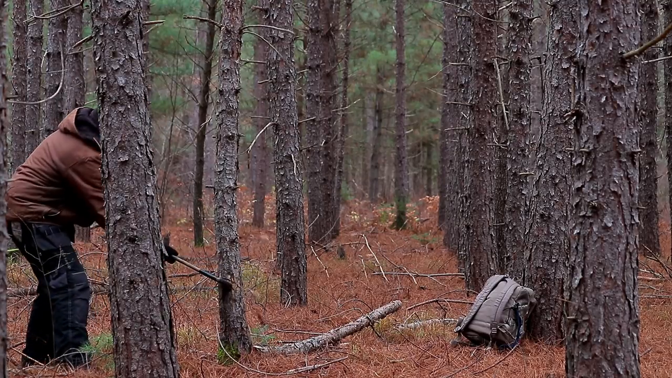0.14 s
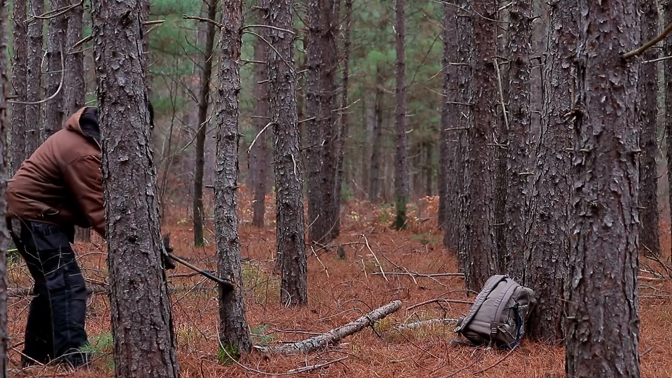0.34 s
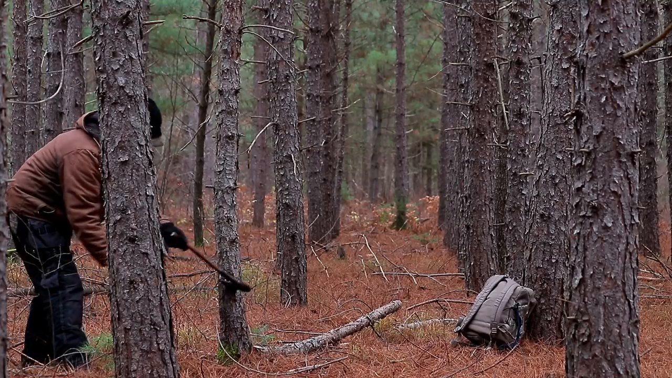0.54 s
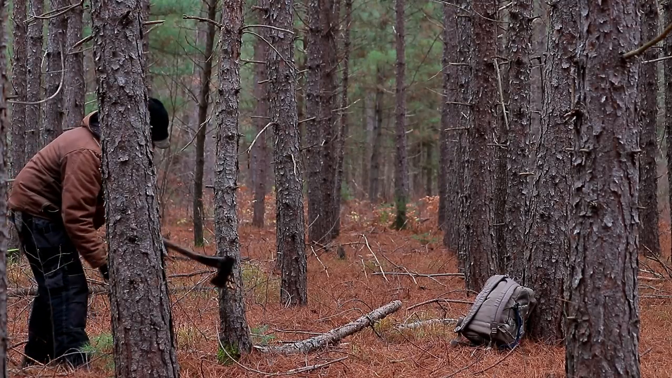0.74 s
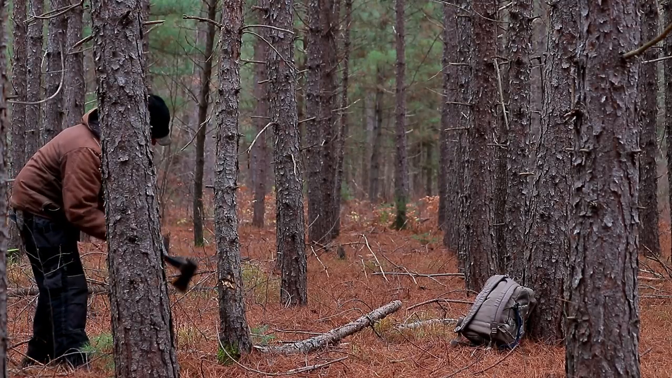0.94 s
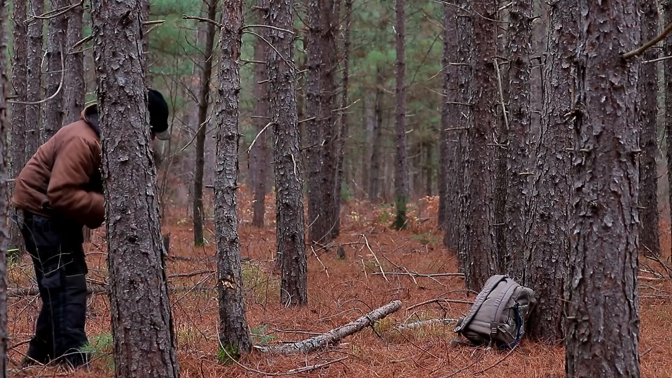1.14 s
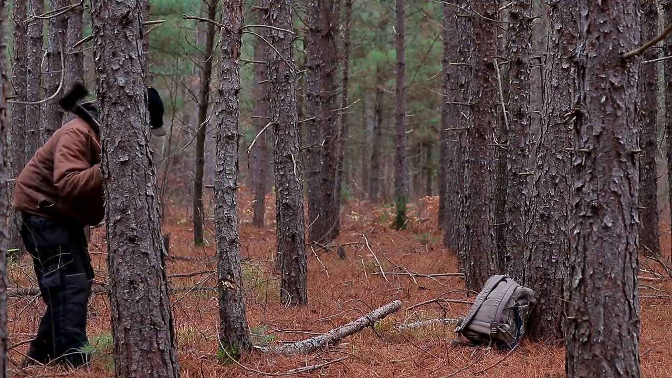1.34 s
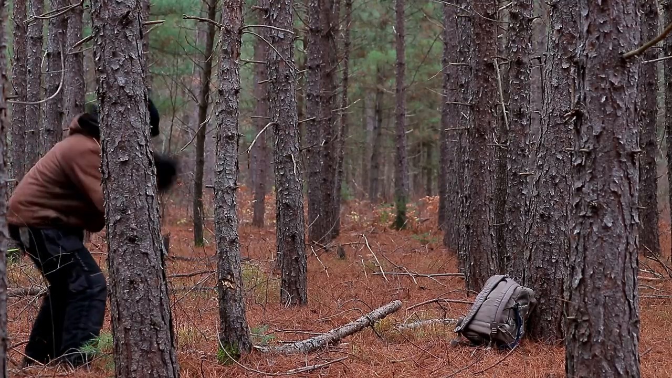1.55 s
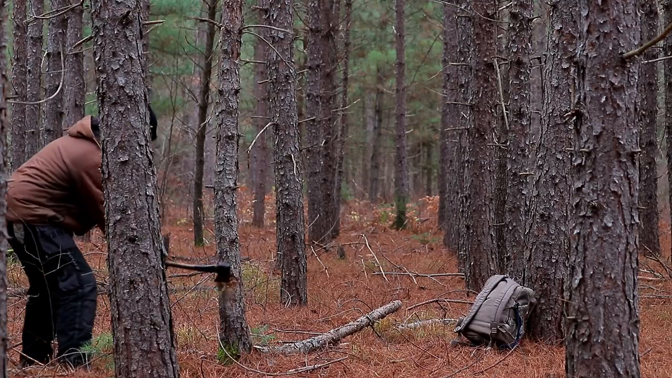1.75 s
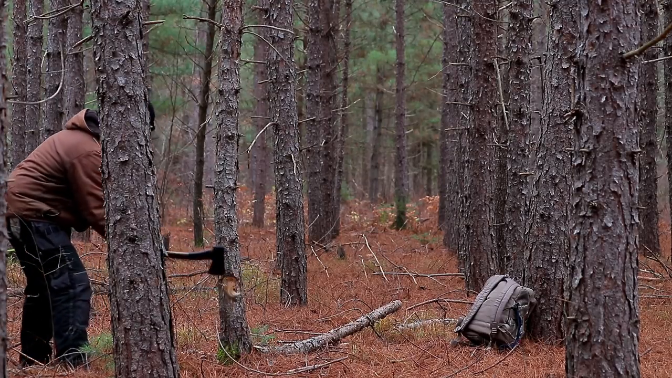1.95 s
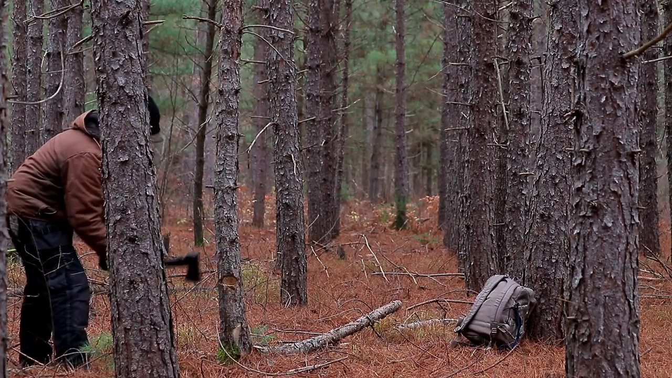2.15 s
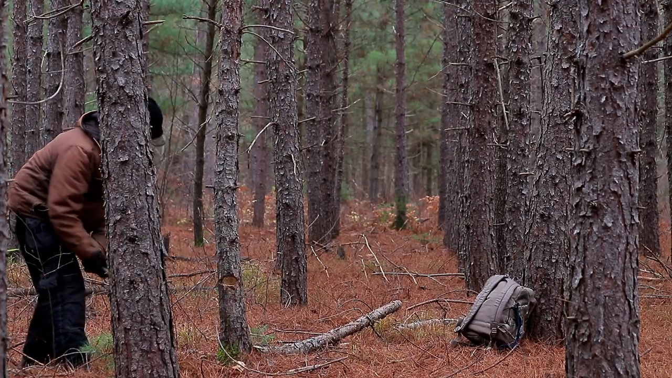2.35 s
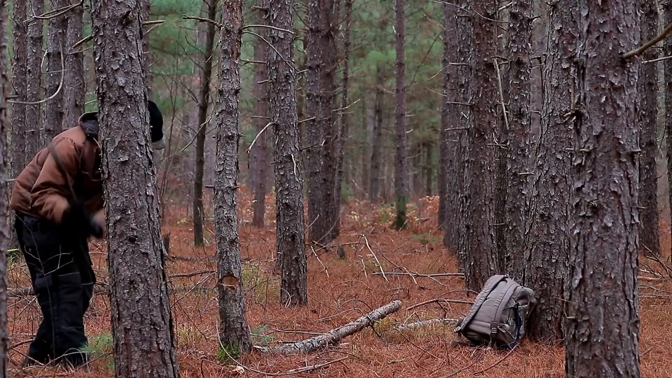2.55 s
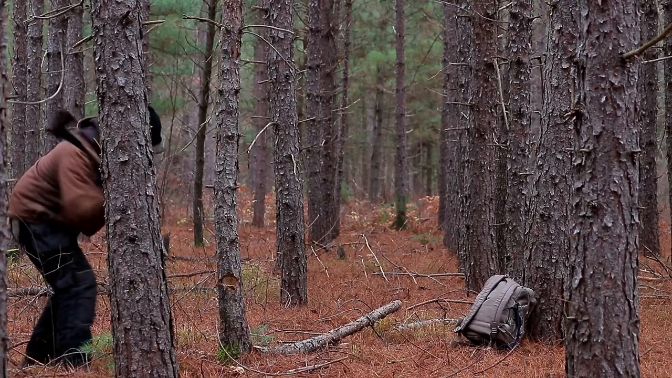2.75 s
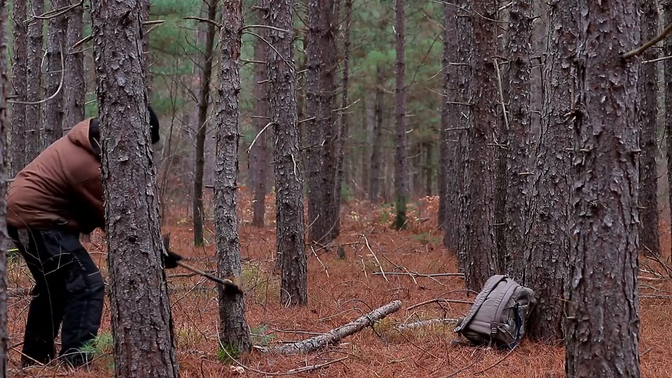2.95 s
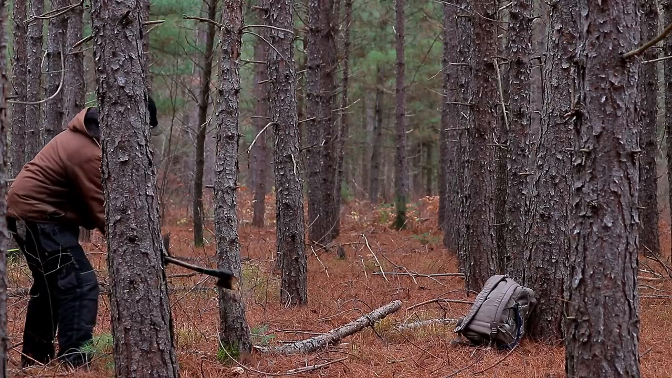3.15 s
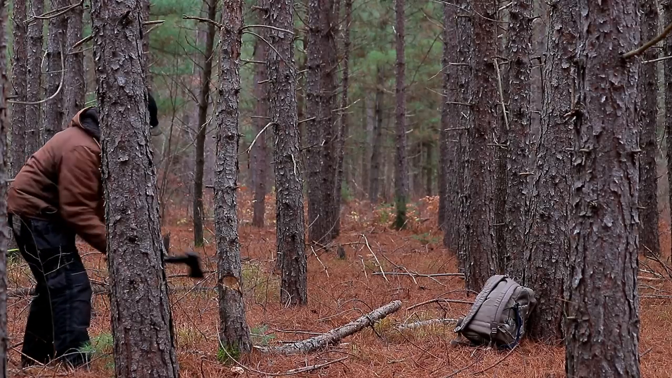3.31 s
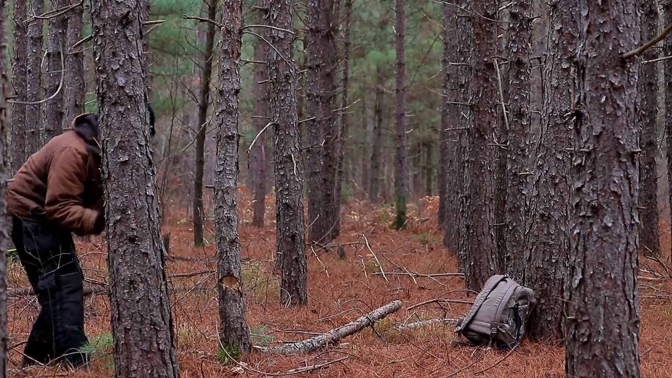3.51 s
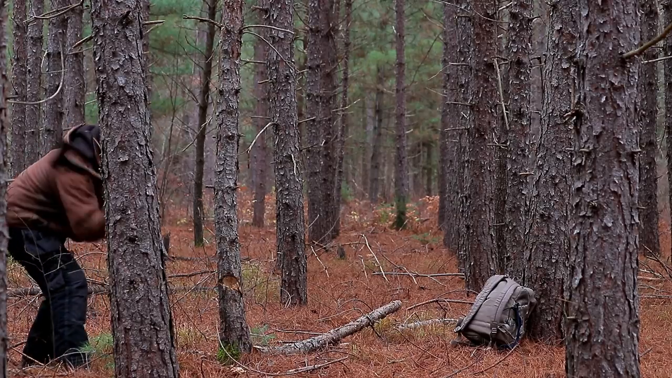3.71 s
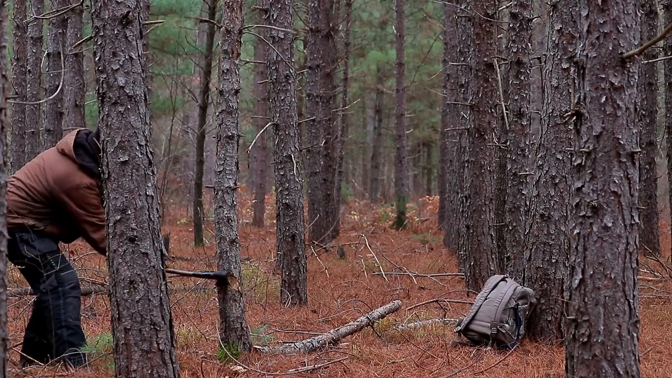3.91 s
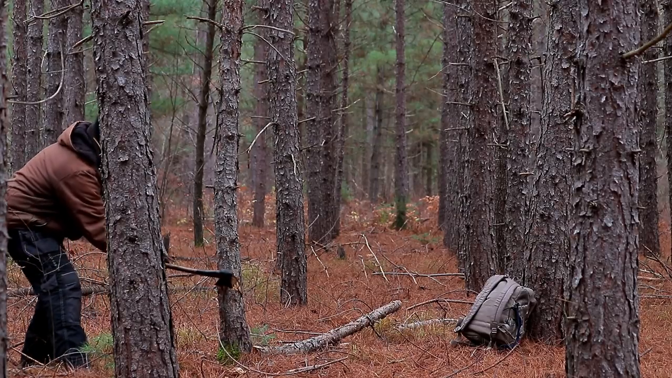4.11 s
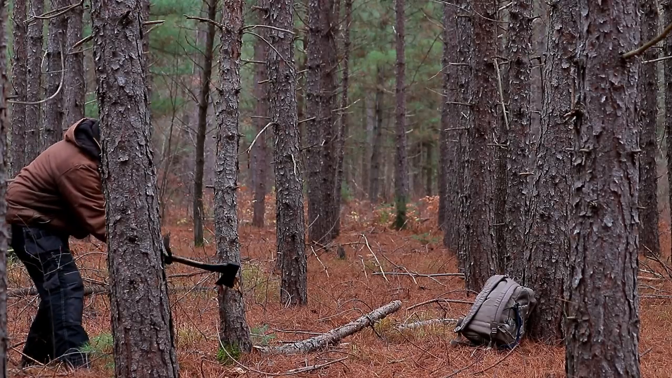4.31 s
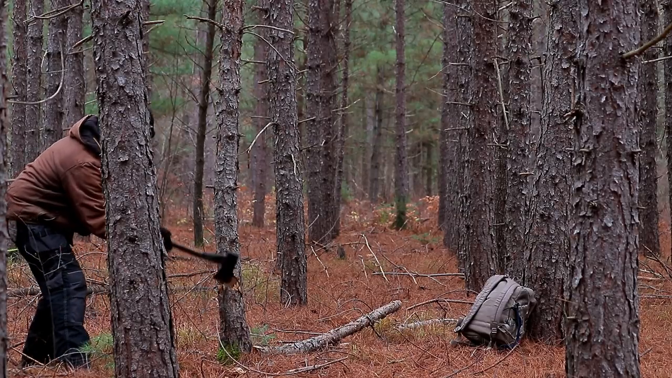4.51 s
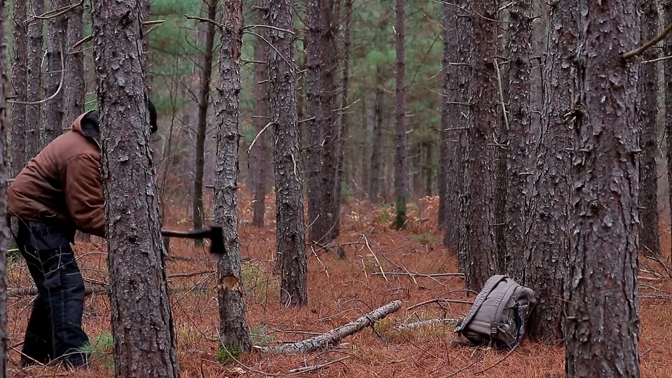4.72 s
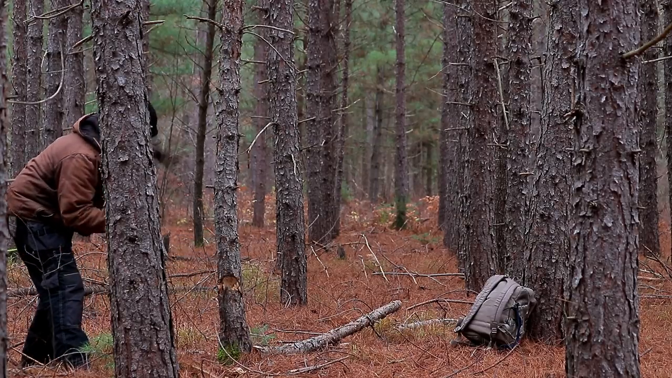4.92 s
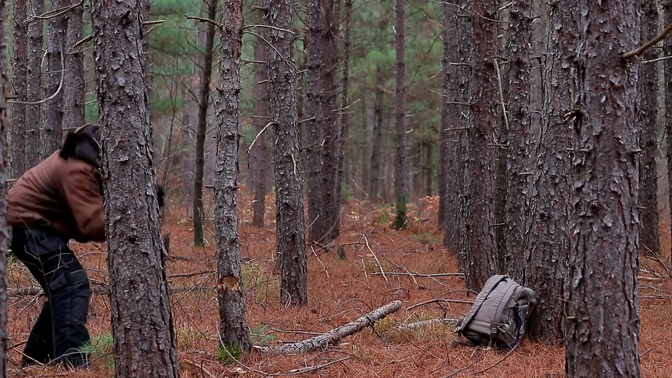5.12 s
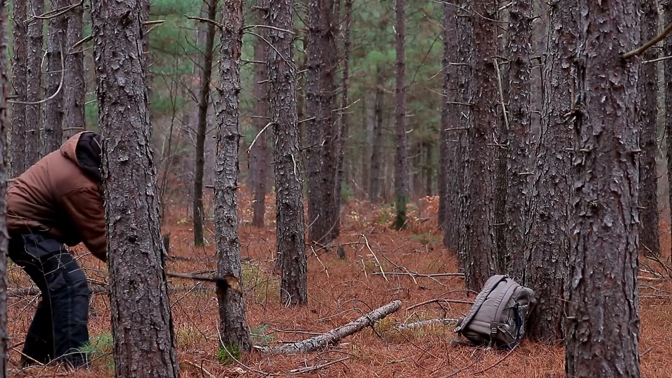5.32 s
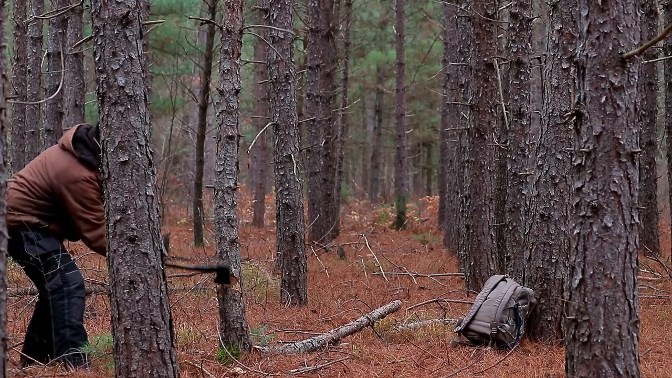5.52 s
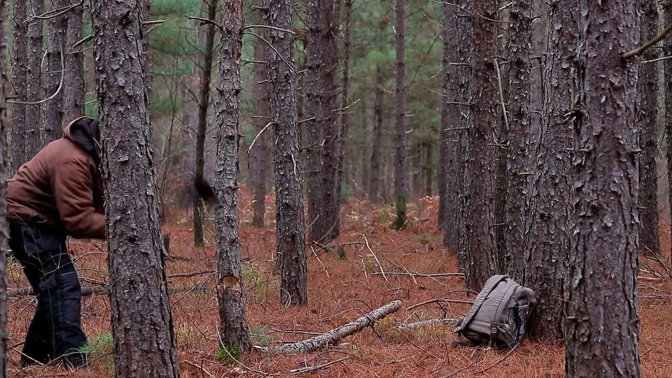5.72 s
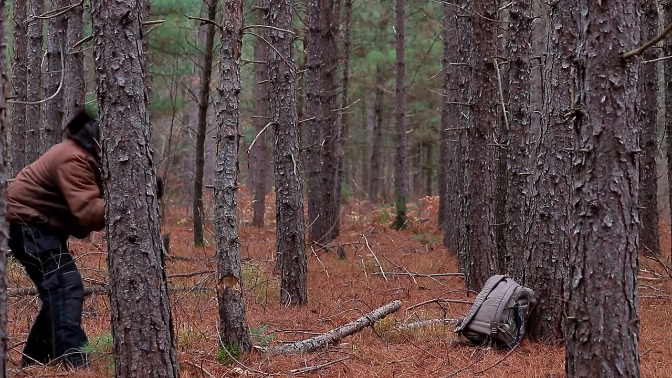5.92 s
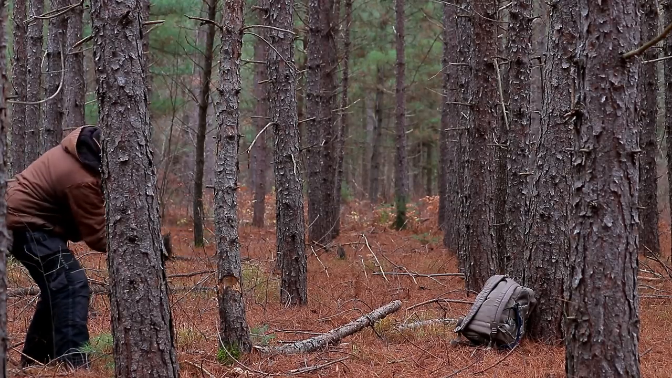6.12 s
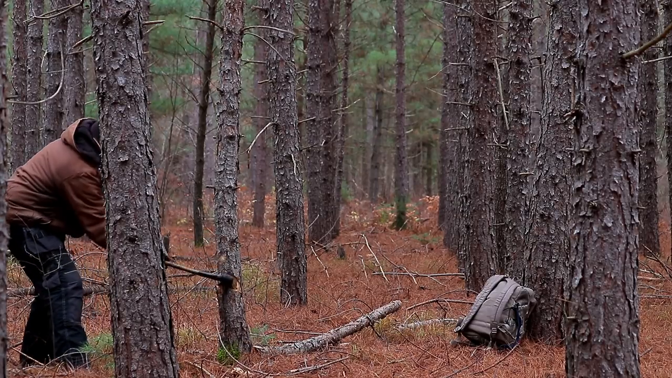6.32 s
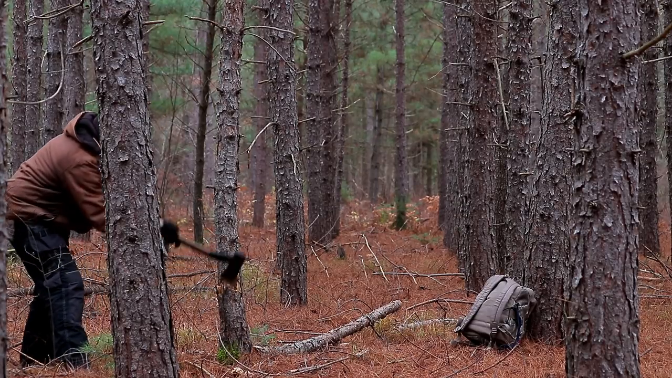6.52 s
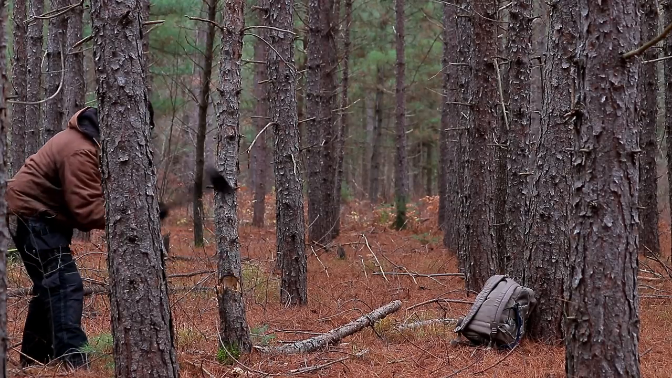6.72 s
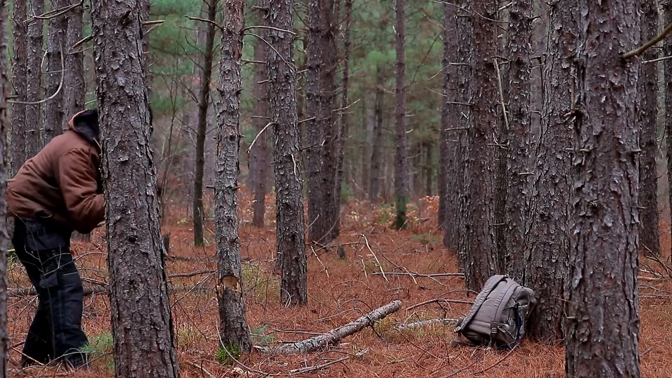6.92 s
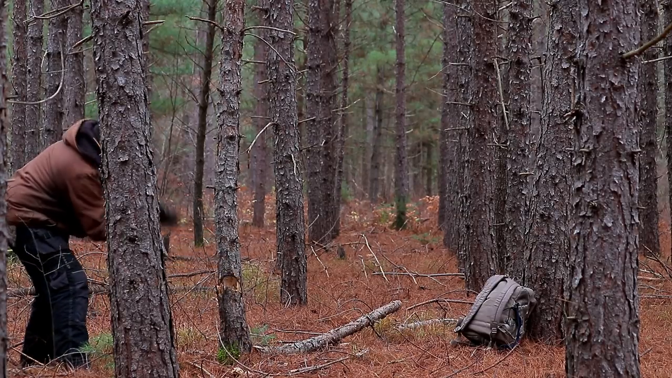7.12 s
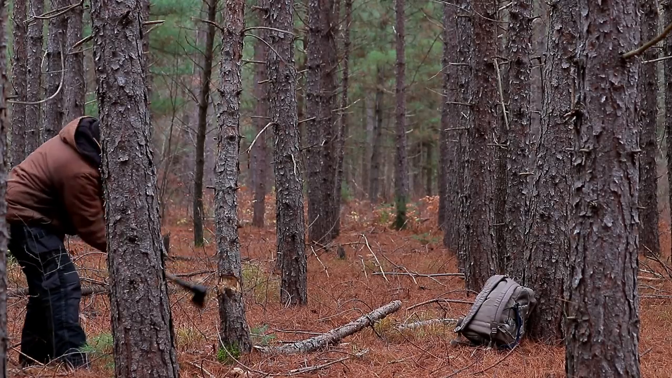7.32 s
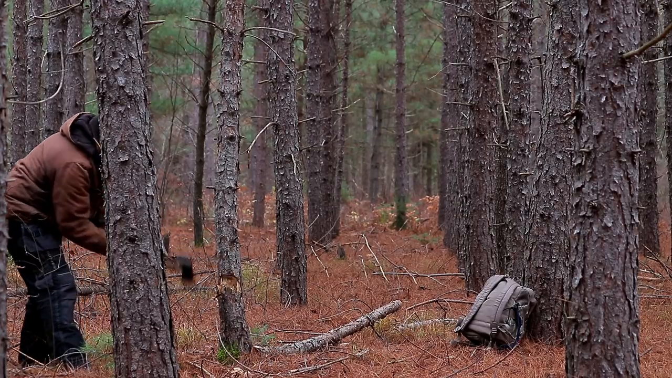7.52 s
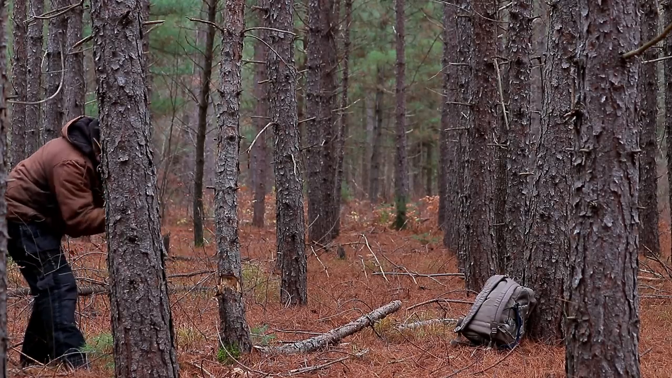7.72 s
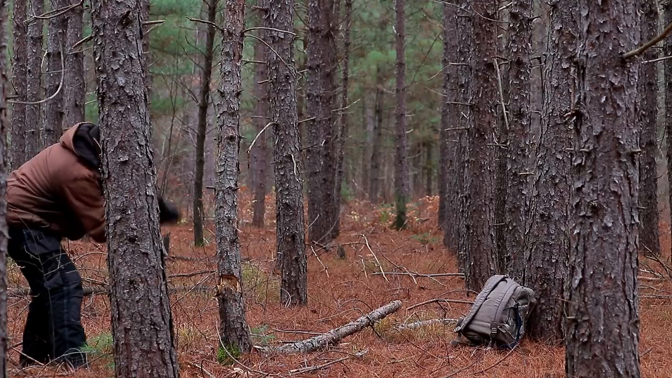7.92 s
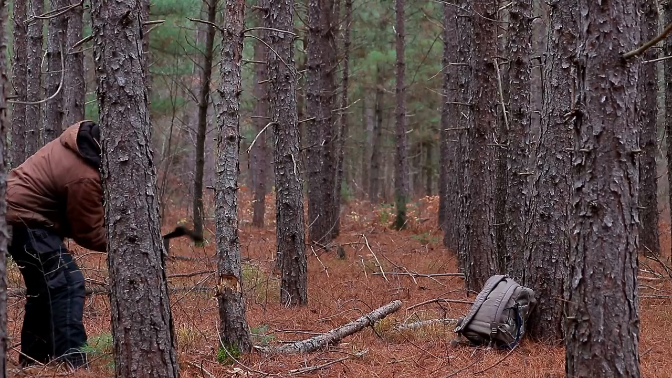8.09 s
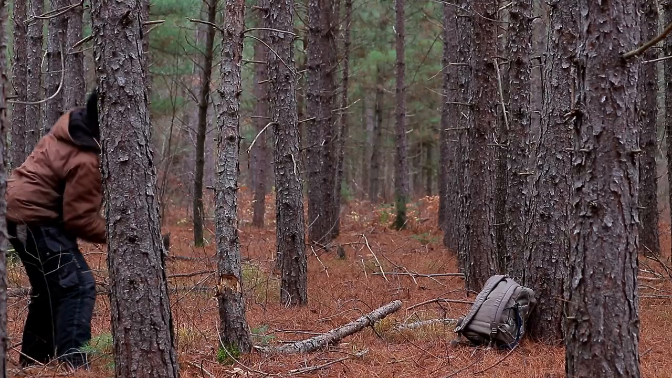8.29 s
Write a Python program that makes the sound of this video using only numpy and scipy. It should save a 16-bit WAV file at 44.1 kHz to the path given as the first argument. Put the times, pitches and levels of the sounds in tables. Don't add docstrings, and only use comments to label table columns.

```python
import sys
import numpy as np
from scipy import signal
from scipy.fft import rfft, irfft, next_fast_len
from scipy.io import wavfile
from scipy.ndimage import uniform_filter1d, minimum_filter1d

SR = 44100
rng = np.random.default_rng(int(sys.argv[2]) if len(sys.argv) > 2 else 0)


def attenuation_scalar(level_db):
    decades = np.asarray(level_db, float) / 20
    return 10 ** decades


def dump(signal):
    limited = np.clip(np.atleast_2d(signal).T, -1, 1)
    pcm = np.round(limited * 32767).astype(np.int16)
    wavfile.write(sys.argv[1], SR, pcm)


N = 368235
LEAD = 4410


def seconds():
    return (np.arange(N + LEAD) - LEAD) / SR


def sample(s):
    return int(round(s * SR)) + LEAD


def rms_one(x):
    return x / np.sqrt(np.mean(x ** 2) + 1e-20)


def band(x, low_hz, high_hz):
    sections = signal.butter(2, [low_hz, min(high_hz, .45 * SR)], "band", fs=SR, output="sos")
    return signal.sosfilt(sections, x)


def drift(rate):
    knots = rng.standard_normal(400)
    return np.interp(seconds() * rate + 5, np.arange(400), knots)


def add(out, s, sound):
    part = out[sample(s):sample(s) + len(sound)]
    part += sound[:len(part)]


def crack(modes, hiss_db):
    t = np.arange(1200) / SR
    late = np.maximum(t - .0008, 0)
    ring = 0
    for k, (hz, width_hz, db) in enumerate(modes):
        dying = np.exp(-np.pi * 1.1 * width_hz * late)
        ring = ring + (-1) ** k * attenuation_scalar(db) * width_hz * dying * np.sin(2 * np.pi * hz * late)
    sinking = (1 - np.exp(-late / 0.0026)) ** 2
    choked = 0.084 + np.exp(-(late / 0.0036) ** 4)
    ring = ring * sinking * choked
    tearing = signal.lfilter([1], [1, -.85], band(rng.standard_normal(1200), 1000, 5000))
    swell = t / 0.0019 * np.exp(1 - t / 0.0022) + 0.027 * np.exp(-t / 0.0027)
    return ring / np.abs(ring).max() + attenuation_scalar(hiss_db) * rms_one(tearing) * swell


def spray():
    t = np.arange(SR // 2) / SR
    noise = rng.standard_normal((2, SR // 2))
    coarse = rms_one(band(noise[0], 4900, 9000)) * (attenuation_scalar(-60 * t / 0.5) + attenuation_scalar(10.5 - 60 * t / 0.025))
    fine = rms_one(band(noise[1], 9000, 15500)) * (attenuation_scalar(-12 - 60 * t / .3) + attenuation_scalar(7.5 - 60 * t / 0.029))
    return (coarse + fine) * (1 - np.exp(-t / 0.00037))


def thump(*loads_db):
    # f/Hz, t60/s
    sway = [(79, 0.25), (113, 0.06), (148, 0.11), (188, .09), (240, 0.083), (312, 0.085), (352, 0.11),
            (430, 0.1), (545, .06)]
    knock = (-2, -7.5, -12, -13)
    # f/Hz, t60/s, level above the third mode/dB
    thud = (165, .04, 4.8)
    t = np.arange(SR // 2) / SR
    loads_db = list(loads_db) + [loads_db[-1] + below for below in knock] + [loads_db[2] + thud[2]]
    modes = list(sway) + [thud[:2]]
    ring = 0
    for (hz, t60), db in zip(modes, loads_db):
        ring = ring + attenuation_scalar(db + 5.5 - 60 * t / t60) * np.sin(2 * np.pi * hz * t)
    push = 1 - np.exp(-t / 0.0035)
    return push * ring


def from_all_sides(sound, tilt_db, blur_hz):
    size = 4096
    sharp = power = np.abs(rfft(sound, size)) ** 2
    for _ in range(2):
        power = uniform_filter1d(power, max(int(blur_hz * size / SR), 1))
    octaves = np.log2((np.arange(len(power)) * SR / size + 300) / 1800)
    wide_bins = int(2200 * size / SR)
    wide = uniform_filter1d(uniform_filter1d(power, wide_bins), wide_bins)
    power = wide + (power - wide) / (1 + 2 ** (4 * (octaves - .75)))
    sharp = sharp / (1 + 2 ** (5 * (octaves - .6)))
    spectrum = np.sqrt(np.abs(power) + sharp) * attenuation_scalar(tilt_db * octaves)
    return np.roll(irfft(spectrum, size), 150)[:300] * np.hanning(300)


def blows():
    # t/s, crack peak level/dB, splinter hiss level/dB, spray level/dB, sideways tilt/dB
    earlier = [
        (-0.026, -13, -10, -38, -2),
    ]
    # t/s, crack peak level/dB, splinter hiss level/dB, spray level/dB, sideways tilt/dB
    strikes = [
        (1.6996, -0.5, -14.5, -34.5, -3),
        (2.9490, -8, -14.5, -34.5, -5),
        (3.8952, -5.5, -24, -34.5, 0.7),
        (5.3308, -4, -21.5, -33.5, -0.7),
        (6.183, -4.5, -22.5, -35.5, -1.5),
        (7.231, -14.5, -12, -32.5, -2.5),
    ]
    # f/Hz, width/Hz, level/dB
    cracks = [
        [(1000, 1300, 8.5), (1485, 460, -1), (2000, 610, -3), (3460, 1640, -5)],
        [(925, 200, -20)] + [(1426.7, 23, -4.5), (1977, 140, 0.5), (2490, 60, 0.0), (3070, 48.7, -3),
         (3360, 87, -3.5), (3998, 110, 3), (4750, 350, -10)],
        [(990, 63, -5.5), (1647, 42, -2.5), (2218, 190, -2), (2730, 75, -8.5), (4060, 230, -11),
         (4850, 380, -13)],
        [(901, 260, -0.5), (1435, 56, -3.5), (2020, 430, -4), (3707, 360, -14.5), (4530, 82, -20.5)],
        [(656, 60, -11), (1253, 270, -1), (2268, 270, -11.5), (3700, 320, -17.5), (4690, 76, -35.5)],
        [(705, 35, -6.5), (1148, 370, 6), (2070, 77, -7), (3724, 120, -14.5), (4300, 50, -14.5)],
        [(1733, 110, -2.5)] + [(1256, 200, -3.0), (2553, 125, -3.5), (3260, 137, -5.5), (4220, 180, 1),
         (5400, 120, -24), (6080, 300, -14.0)],
    ]
    # root mode level/dB, trunk mode level/dB, depth of bite/0-1
    thumps = [
        (-29.5, -20, 0),
        (-35.5, -23.5, 0),
        (-27, -17.5, 0.31),
        (-24.5, -11.5, 0),
        (-30, -13.5, 0.59),
        (-30, -16, 0.86),
        (-30, -18.5, 0),
    ]
    glancing_db = (2.5, -8.5, -13, -15)
    deep_db = (-4.5, -0.95, 2.7, -1.5)
    glancing_lag_s, deep_lag_s = 0.0026, 0.0008
    sideways_db, aimed = -3.5, 0.44
    direct, sent = np.zeros((2, N + LEAD))
    for row, modes, (root_db, trunk_db, depth) in zip(list(earlier) + list(strikes), cracks, thumps):
        s, crack_db, hiss_db, spray_db, tilt_db = row
        loads_db = trunk_db + (1 - depth) * np.array(glancing_db) + depth * np.array(deep_db)
        lag = (1 - depth) * glancing_lag_s + depth * deep_lag_s
        bite = attenuation_scalar(crack_db + 2.5) * crack(modes, hiss_db)
        shake = thump(root_db, *loads_db)
        add(direct, s - .0008, bite)
        add(direct, s, attenuation_scalar(spray_db - 21.5) * spray())
        add(direct, s + lag, shake)
        sideways = from_all_sides(bite, tilt_db, blur_hz=645.3)
        add(sent, s - 150 / SR, attenuation_scalar(sideways_db - aimed * crack_db) * sideways)
        add(sent, s + lag, attenuation_scalar(-6.5) * shake)
    return direct, sent


def forest(dry):
    # f/Hz, near trunks level/dB, near t60/s, far trunks level/dB, far t60/s
    scatter = [(100, -43.5, 0.73, -58.5, 0.32), (257, -37.5, 0.12, -62.5, 0.9),
               (631.2, -40.5, 0.21, -58, 1.5), (1190, -44.5, 0.17, -58.5, 1.3),
               (2320, -40, 0.17, -57.5, 1.41), (4600, -43.5, 0.32, -62.5, 1.8),
               (8040, -40.5, 0.09, -52.5, 1), (14000, -45.5, 0.1, -57.5, 0.37)]
    t = np.arange(int(1.5 * SR)) / SR
    table = np.array(scatter)
    edges = 45 * 2 ** np.arange(0, 9, .5)
    white = rng.standard_normal((2, len(t)))
    response = 0
    for k, (low, high) in enumerate(zip(edges, edges[1:])):
        log_hz = np.log(low * high) / 2
        near_db, near_t60, far_db, far_t60 = (np.interp(log_hz, np.log(table[:, 0]), c) for c in table.T[1:])
        dying = attenuation_scalar(near_db - 60 * t / near_t60) + attenuation_scalar(far_db - 60 * t / far_t60)
        dying = dying * attenuation_scalar(-9 * t * low * high / 4000 ** 2)
        response = response + dying * band(white[k % 2], low, high)
    arrival = np.clip((t - .003) / 0.0044, 0, 1)
    clumps = np.interp(t * 180, np.arange(300), rng.standard_normal(300))
    trunks = attenuation_scalar(1.8 * clumps * np.exp(-t / .3))
    return signal.fftconvolve(dry, response * arrival * trunks)[:len(dry)]


def air():
    # f/Hz, level/dB
    colour = [(25, 7), (50, -7), (75, -4.5), (132, -4), (159, -13.5), (203, -18.5), (265, -8.5),
              (386, -2.13), (518, -10), (1100, -12.5), (2330, -28), (3100, -34.5), (5200, -42.5),
              (15000, -49)]
    # f/Hz, width/Hz, level/dB
    housing = (3880, 330, 8)
    air_db, whine_db, whine_hz = -57.5, -93.5, 15675
    size = next_fast_len(N + LEAD)
    hz = np.arange(size // 2 + 1) * SR / size + 1
    colour_db = np.interp(np.log(hz), np.log(np.array(colour)[:, 0]), np.array(colour)[:, 1])
    colour_db += housing[2] / (1 + (2 * (hz - housing[0]) / housing[1]) ** 2)
    noise = rms_one(irfft(rfft(rng.standard_normal(size)) * attenuation_scalar(colour_db), size)[:N + LEAD])
    whine = np.sqrt(2) * attenuation_scalar(whine_db + 1.5 * drift(25)) * np.sin(2 * np.pi * whine_hz * seconds())
    breathing = attenuation_scalar(air_db + .5 * drift(0.5) + 0.39 * drift(30))
    return breathing * noise + whine


def rustle():
    # t/s, level/dB
    stirs = [
        (.65, -97),
        (3.82, -77),
        (4.2, -74.5),
        (4.58, -76.5),
        (4.83, -79.5),
        (5.95, -82.5),
        (6.5, -74),
        (8.03, -81.5),
        (8.25, -78.5),
    ]
    still_db, rise_db_per_s, fall_db_per_s = -91.5, 79, 95
    t = seconds()
    swells = [db - np.maximum(rise_db_per_s * (s - t), fall_db_per_s * (t - s)) for s, db in stirs]
    born = rng.random(len(t)) < 1100 * attenuation_scalar(6 * drift(14)) / SR
    strength = attenuation_scalar(4.5 * np.minimum(rng.exponential(1, len(t)), 4))
    grains = born * strength * rng.choice([-1, 1], len(t))
    dealt = rng.integers(0, 5, len(t))
    crackle = 0
    for k, hz in enumerate(np.geomspace(3000, 9000, 5)):
        crackle = crackle + band(grains * (dealt == k) + 1e-18, hz / 1.1, hz * 1.25) * (3000 / hz) ** .7
    return rms_one(crackle) * attenuation_scalar(np.maximum(np.max(swells, axis=0), still_db) - 4)


def creak():
    # t/s, length/s, level/dB, slip rate at start f/Hz, at end f/Hz
    tugs = [
        (0.349, 0.037, -48, 220.5, 346),
        (0.385, .036, -50, 344.6, 600),
    ]
    # f/Hz, width/Hz
    wedge = (1020, 180)
    attack_s, hold, edge_db = 0.009, .55, -14
    out = np.zeros(N + LEAD)
    for s, length, db, start_hz, end_hz in tugs:
        along = np.linspace(0, 1, int(length * SR))
        wobble = uniform_filter1d(rng.standard_normal((2, 3000)), 60, axis=1)[:, :len(along)]
        hz = start_hz + (end_hz - start_hz) * along
        phase = 2 * np.pi * np.cumsum(hz * (1 + .15 * wobble[0])) / SR
        slips = 0
        for k in range(1, 12):
            detuning = 2 * (k * hz - wedge[0]) / wedge[1]
            slips = slips + np.cos(k * phase) / (1 + detuning ** 2) ** 0.52
        level_db = db + np.interp(along, [0, attack_s / length, hold, 1], [edge_db, 0, -3, edge_db])
        add(out, s, attenuation_scalar(level_db) * rms_one(slips * (1 + 0.99 * wobble[1])))
    return out


def ticks(rows, octaves, decay_s):
    out = np.zeros(N + LEAD)
    t = np.arange(900) / SR
    spread = 2 ** np.clip(octaves, .2, 2)
    for (s, db, hz), noise in zip(rows, rng.standard_normal((len(rows), 900))):
        contact = noise * np.exp(-t / np.clip(decay_s, .0003, .01)) + 3.6 * (t == t[8])
        tick = band(contact, hz / spread, hz * spread)
        tick = band(tick, hz / spread ** 2.1, hz * spread ** 1.4) + 0.14 * tick
        add(out, s, attenuation_scalar(db) * tick / np.abs(tick).max())
    return out


def snaps():
    # t/s, peak level/dB, f/Hz; the one at 190 Hz is the low thud of a footstep
    fractures = [(0.438, -55, 4100), (0.6377, -50, 3800), (0.7098, -50.5, 2730), (0.7196, -58, 4140),
                 (3.1547, -48.5, 3760), (3.2298, -45, 2590), (4.1228, -45.5, 4530), (4.1463, -51, 4260),
                 (4.2183, -47.5, 3110), (4.2572, -54.5, 4460), (4.4015, -35.5, 2590), (4.4872, -49.5, 2200),
                 (4.55, -62, 5980), (4.6831, -61, 4970), (5.2222, -55.5, 2200), (5.804, -49.5, 3500),
                 (5.8369, -58, 2800), (5.925, -50, 190), (5.9266, -57.5, 4400), (6.1618, -62.5, 4390),
                 (6.3538, -40, 3410), (6.5652, -61, 2715), (6.6802, -53, 3000), (6.8316, -49, 4220),
                 (7.5989, -58, 5960), (7.9764, -70.5, 6020), (8.016, -49, 4500), (8.0644, -62.5, 3900),
                 (8.321, -62, 3970), (8.3393, -58, 3200)]
    return ticks(fractures, octaves=.9, decay_s=0.0012)


def pings():
    # t/s, peak level/dB, f/Hz
    landings = [(0.4957, -63, 4870), (0.5374, -50, 2440), (6.6264, -59, 4600), (0.637, -44.5, 1290),
                (0.8794, -61, 7460), (1.1828, -59, 3920), (1.4879, -58, 3440), (2.4731, -55.5, 3000),
                (2.892, -58, 3880), (3.8147, -57, 3950), (4.0988, -38, 1497), (4.2764, -55.7, 3300),
                (4.401, -40, 1000), (4.402, -48, 4360), (4.4763, -59, 3900), (4.6347, -55.5, 3600),
                (4.9364, -58, 3600), (5.0997, -58.5, 3805), (5.9699, -50.5, 4220), (6.2883, -41, 3600),
                (6.354, -48, 7530), (6.5005, -46.5, 3400), (6.5121, -40, 1850), (7.2498, -20, 2840),
                (7.298, -42.5, 11100), (7.309, -57, 12080), (8.014, -40, 2000), (8.0165, -46.5, 4340),
                (8.155, -47, 3200), (8.2398, -55.5, 3070)]
    return ticks(landings, octaves=.4, decay_s=.0018)


def grazes():
    # t/s, peak level/dB, f/Hz
    touches = [
        (1.6968, -29.5, 2000),
        (2.9465, -35, 2000),
        (3.8928, -27.5, 1520),
        (5.3285, -19.5, 1500),
        (6.1800, -21.5, 1604),
        (7.2295, -21, 2000),
    ]
    return ticks(touches, octaves=0.97, decay_s=.003)


def scene():
    direct, sent = blows()
    small = snaps() + pings() + creak()
    mix = direct + grazes() + small + forest(sent + small) + rustle() + air()
    return mix[None, LEAD:]


def roll_off(x):
    return signal.sosfilt(signal.butter(12, 16460, fs=SR, output="sos"), x)


def record(dry):
    ceiling, limit_s = .985, .0012
    heard = signal.sosfilt(signal.butter(4, 60, "high", fs=SR, output="sos"), dry)
    span = int(limit_s * SR)
    needed = ceiling / np.maximum(np.abs(heard), ceiling)
    gain = uniform_filter1d(minimum_filter1d(needed, size=span), size=span)
    return roll_off(gain * heard)


dry = scene()
out = record(dry)
dump(out)
```